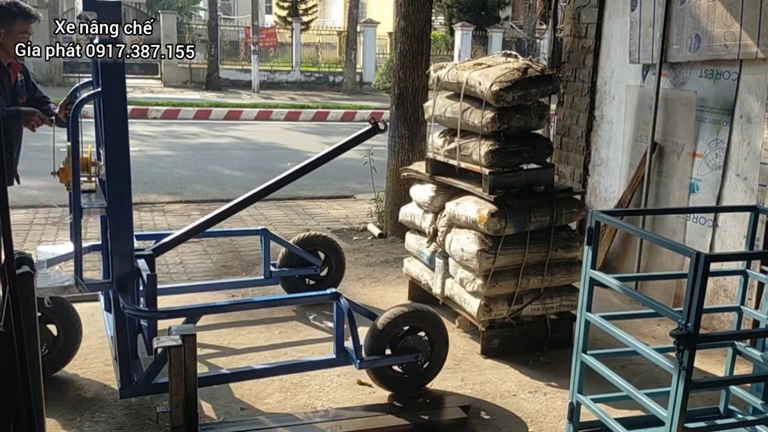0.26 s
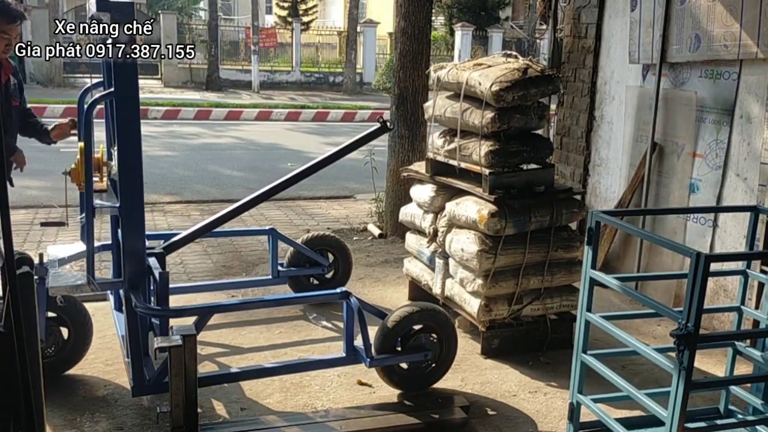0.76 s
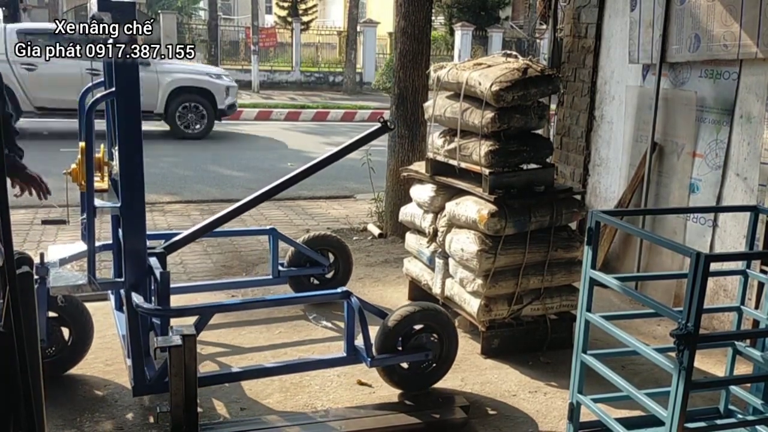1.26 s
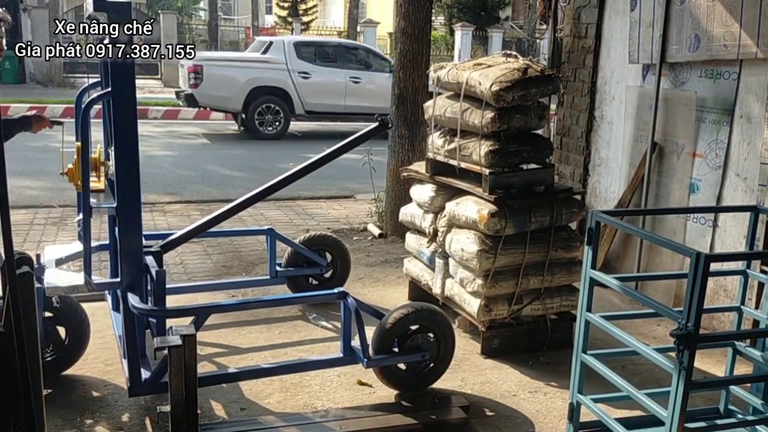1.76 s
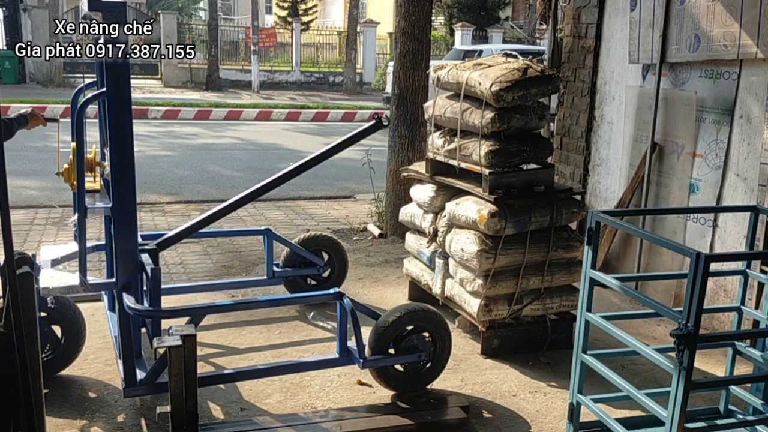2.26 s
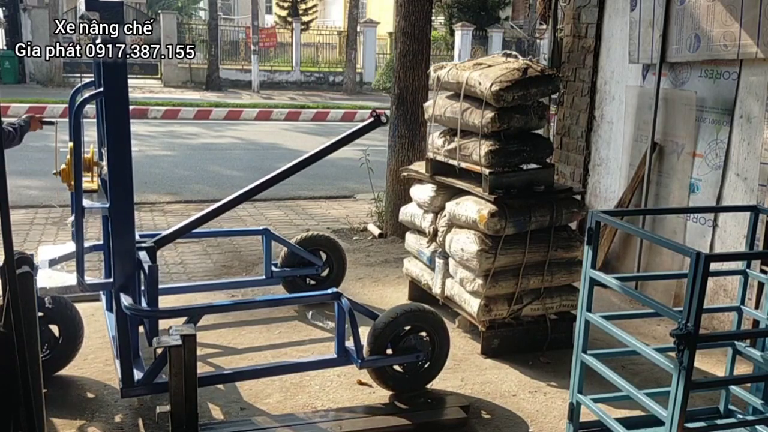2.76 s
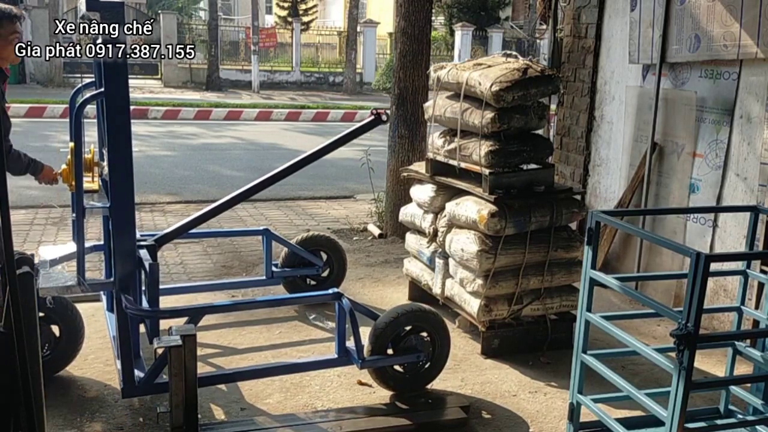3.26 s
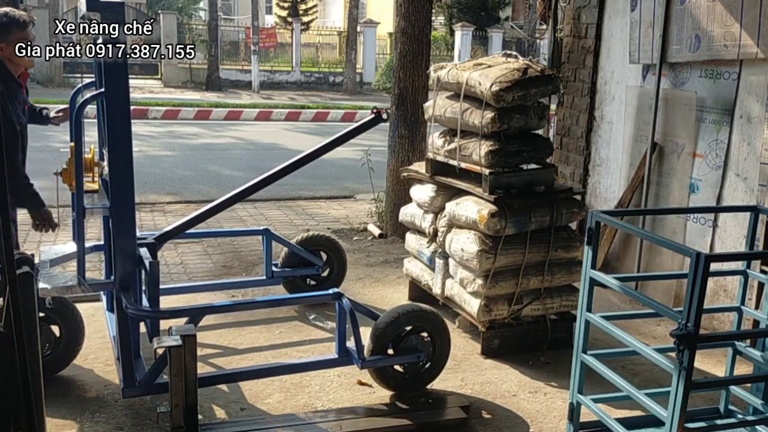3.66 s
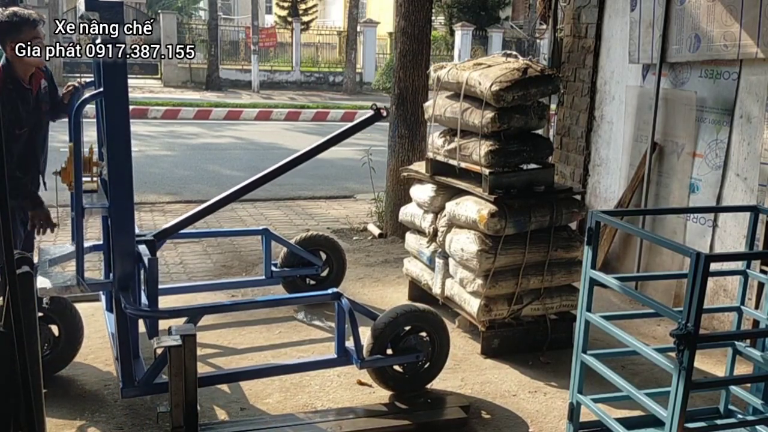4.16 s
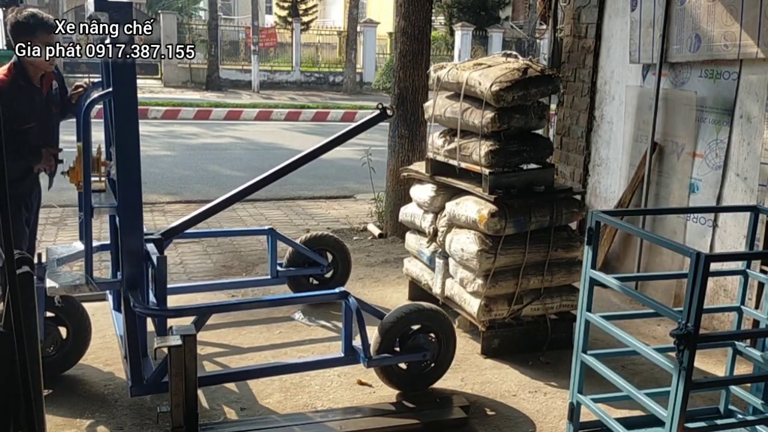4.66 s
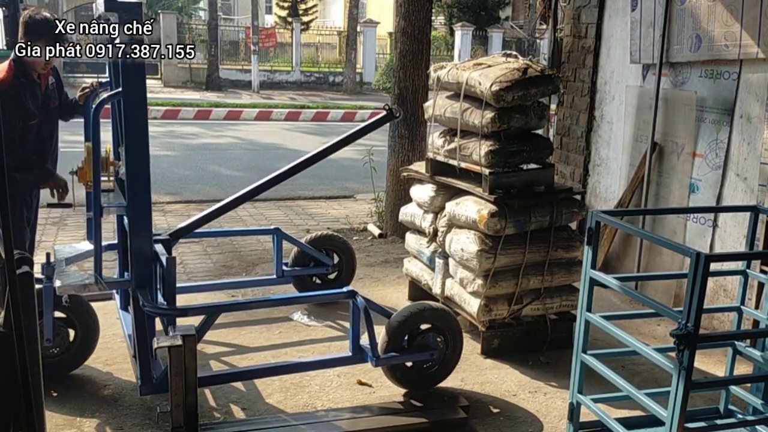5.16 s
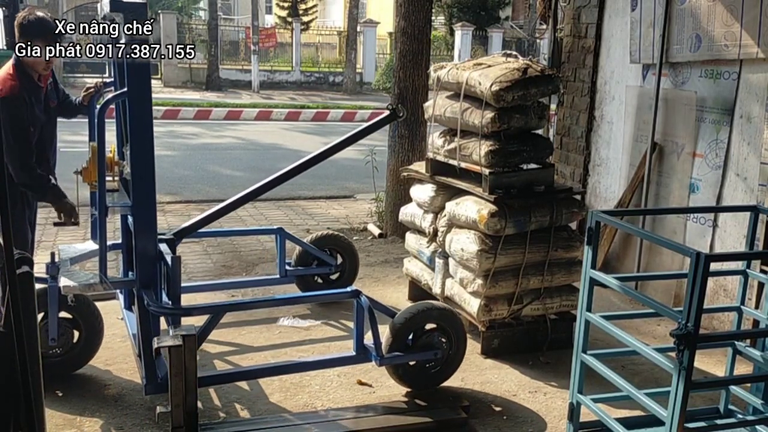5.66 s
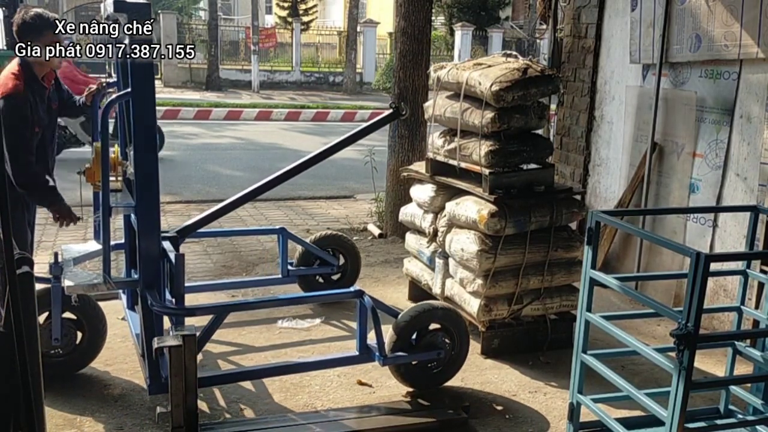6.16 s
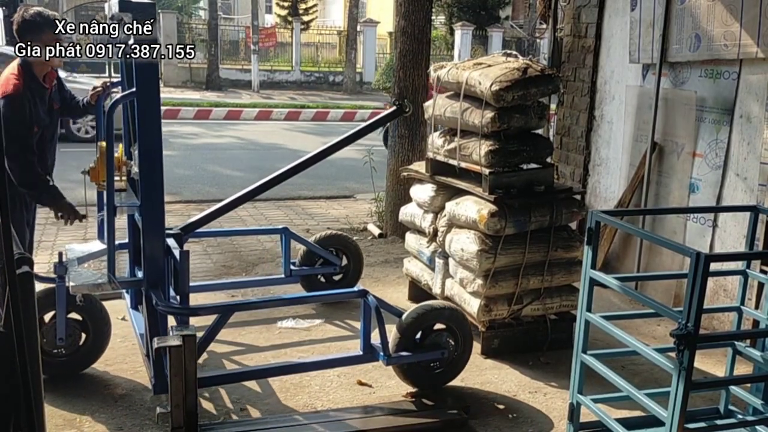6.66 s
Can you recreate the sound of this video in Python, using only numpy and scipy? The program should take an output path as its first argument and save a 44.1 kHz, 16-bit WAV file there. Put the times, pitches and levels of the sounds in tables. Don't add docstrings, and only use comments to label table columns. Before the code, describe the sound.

A hand winch on a steel frame is cranked in three fast, bright metallic rattling runs outdoors while street traffic passes quietly behind.

```python
import sys
import numpy as np
from scipy import signal
from scipy.fft import rfft, irfft, next_fast_len
from scipy.io import wavfile
from scipy.ndimage import uniform_filter1d, map_coordinates

SR = 44100
rng = np.random.default_rng(int(sys.argv[2]) if len(sys.argv) > 2 else 0)


def boost(x):
    u = np.asarray(x, float) / 20
    return 10 ** u


def int16_out(signal):
    q = np.round(np.clip(np.atleast_2d(signal).T, -1, 1) * 32767)
    wavfile.write(sys.argv[1], SR, q.astype(np.int16))


N = 304728


def unit(x):
    return x / np.sqrt(np.mean(x ** 2) + 1e-20)


def along(points, hz):
    f, v = np.transpose(points)
    return np.interp(np.log(hz + 1), np.log(f + 1), v)


def curves(rows):
    s, *cols = np.transpose(rows)
    return [np.interp(np.arange(N) / SR, s, c) for c in cols]


def wobble(rate):
    knots = rng.standard_normal(int(N * 200 / SR) + 4)
    return map_coordinates(knots, [np.arange(N) * min(rate, 200) / SR])


def filtered(x, response):
    n = x.shape[-1]
    m = next_fast_len(n + 8192)
    return irfft(rfft(x, m) * response(np.fft.rfftfreq(m, 1 / SR)), m)[..., :n]


def noise(spectrum):
    return unit(filtered(rng.standard_normal(N), lambda hz: boost(along(spectrum, hz))))


# time in seconds, rattle level in dB, pace in teeth per second.
RUNS = [
    [(0.0, -22, 43.5), (0.11, -22.5, 44), (0.32, -26.5, 44.5), (0.56, -23.5, 39), (0.665, -23.5, 39)],
    [(1.51, -22, 40), (1.85, -22.5, 43), (2.13, -22, 51), (2.6, -22.5, 51), (2.95, -24.5, 46),
     (3.25, -22, 45), (3.5, -22, 41), (4.25, -21, 43), (4.45, -25.5, 47)],
    [(5.76, -24.5, 40.5), (5.92, -21.5, 42), (6.05, -23, 42.5), (6.33, -21, 42), (6.6, -23.5, 42),
     (6.91, -20.5, 51)],
]
# start in seconds, blow in dB.
DROPS = [
    (1.494, 10),
    (5.5533, 8.5),
    (5.589, 6),
    (5.6135, 10.5),
    (5.69, 10.5),
    (5.7275, 13),
    (5.7604, 13),
]
FRAME_DB, MAST_DB = -13, -18.5
FRAME_SWAY_DB, MAST_SWAY_DB, SWAY_PER_S = -0.15, 0.93, 6
DROP_FRAME_DB, DROP_MAST_DB = -13.5, -20
TURN_S, FIRST_PULL_S, PULL_DB, FRAME_FEELS = 0.545, 0.1, 1.5, 0.17


def blows():
    rows = [[s, db, db + DROP_FRAME_DB, db + DROP_MAST_DB] for s, db in DROPS]
    frame = FRAME_DB + FRAME_SWAY_DB * wobble(SWAY_PER_S)
    mast = MAST_DB + MAST_SWAY_DB * wobble(SWAY_PER_S)
    steps_per_s = 2000
    for run in RUNS:
        s, level, rate = np.transpose(run)
        start = -0.4 if s[0] < 0.05 else s[0]
        t = np.arange(start, s[-1], 1 / steps_per_s)
        for speed, share_db, scatter_db, jitter in [(1, 2, 2.47, 0.08), (5.3, 0, 3.5, 0.5)]:
            turns = np.cumsum(speed * np.interp(t, s, rate)) / steps_per_s
            hit_s = t[np.flatnonzero(np.diff(np.floor(turns)))]
            luck = rng.standard_normal((len(hit_s), 4))
            per_s = speed * np.interp(hit_s, s, rate)
            db = np.interp(hit_s, s, level) + share_db + 10 * np.log10(SR / per_s)
            at = np.clip((hit_s * SR).astype(int), 0, N - 1)
            pull = PULL_DB * np.cos(2 * np.pi * (hit_s - s[0] - FIRST_PULL_S) / TURN_S)
            above = [0 * db, frame[at] + FRAME_FEELS * pull, mast[at] + pull]
            levels = db + above + scatter_db * luck[:, 1:].T
            rows += np.transpose([hit_s + jitter * luck[:, 0] / per_s, *levels]).tolist()
    return np.array(rows)


def steel_patterns():
    jags = rng.standard_normal(SR // 60)
    clumps = lambda hz: boost(1.4 * np.interp(hz / 32, np.arange(len(jags)), jags))
    biases = 1.5 * rng.standard_normal((4, 60))
    return clumps, biases - biases.mean(axis=0)


# frequency in Hz, time to fall 60 dB in seconds.
DYING = [(600, 0.51), (1300, 0.42), (3500, 0.64), (6500, 0.46), (8000, 0.5), (11000, 0.4), (13500, 0.51),
         (15500, 0.33)]


def ring(spectrum, modes, crack_db, clumps, bias):
    t = np.arange(SR) / SR
    crack = boost(crack_db - 60 * t / 0.004)
    burst = rng.standard_normal((2, SR)) * [crack, np.ones(SR)]
    hz, when, z = signal.stft(burst, SR, nperseg=512)
    z[1] *= boost(-60 * when / along(DYING, hz)[:, None])
    favour = np.interp(hz / 450, np.arange(len(bias)), bias)
    colour = boost(along(spectrum, hz) + favour)[:, None]
    dense = signal.istft(z.sum(0) * colour, SR, nperseg=512)[1][:SR]
    dense = filtered(dense, clumps)
    lines = np.zeros(SR)
    for f, db, t60 in modes:
        tone = np.sin(2 * np.pi * ((f + rng.normal(0, 18)) * t + rng.random()))
        lines += boost(db + rng.normal(0, 0.47) - 60 * t / t60) * tone / np.sqrt(t60)
    rise = 1 - np.exp(-t / 0.00073)
    return rise * (dense / np.linalg.norm(dense) + lines * np.sqrt(28 / SR))


# frequency in Hz, density in dB per Hz.
WHEEL = [(2470, -35), (4300, -8), (5200, -5), (5620, -9), (6100, -8), (6330, -4), (7100, -4), (7750, 0),
         (8450, -1), (8900, -4), (10400, -7), (11800, -4.5), (13800, -5), (15550, 6.3)]
FRAME = [(1120, -71), (1900, -3), (2090, 0), (2630, 1.5), (3040, -3.5), (3460, 0.5), (4500, -8),
         (5850, -10), (9900, -120)]
MAST = [(320, -14), (550, -12.5), (847, 0), (1040, -3), (1360, -3), (1590, -3.5), (1730, 2), (2000, -11.5),
        (2600, -10), (4400, -120)]
# frequency in Hz, level in dB, time to fall 60 dB in seconds.
WHEEL_MODES = [(4750, -30, .65), (4930, -30, .4), (5325, -26, .35), (5520, -32, .4), (5800, -33, .3),
               (7340, -26, .4), (7742, -27, .3), (8013, -27, .4), (8125, -24, .4), (8430, -26, .3),
               (14370, -28, .25), (14830, -24, .25), (15530, -25, .2)]
FRAME_MODES = [(2147, -23, .3), (2464, -23, .35), (2718, -22, .25), (3346, -22, .3), (3903, -24, .35),
               (4032, -25, .35)]
MAST_MODES = [(856, -13, .22), (1385, -18, .3), (1692, -14, .35), (1790, -19, .3)]


def winch(clumps, biases):
    lead = SR // 2
    rows = blows()
    at = np.clip(np.round(rows[:, 0] * SR).astype(int) + lead, 0, N + lead - 1)
    leaning = np.array([wobble(3.5) for _ in range(4)])[:, np.maximum(at - lead, 0)]
    spot = np.argmax(leaning + 0.6 * rng.standard_normal((4, len(at))), axis=0)
    bodies = [(1, WHEEL, WHEEL_MODES), (2, FRAME, FRAME_MODES), (3, MAST, MAST_MODES)]
    m, total = next_fast_len(N + lead + SR), 0
    for k, bias in enumerate(biases):
        for col, body, modes in bodies:
            train = np.bincount(at[spot == k], boost(rows[spot == k, col]), m)
            blow = ring(body, modes, crack_db=-18, clumps=clumps, bias=bias)
            total = total + rfft(train) * rfft(blow, m)
    return irfft(total, m)[lead:lead + N]


# time in seconds, level in dB.
GUSTS = [(0, -37), (.3, -34.5), (.55, -40.5), (1.25, -35), (1.9, -42), (2.2, -40.5), (3.7, -44.5),
         (4.45, -37.5), (5.2, -48), (5.9, -47), (6.91, -46)]
# frequency in Hz, density in dB per Hz.
WIND = [(1, -18), (5, -20), (12, 10.5), (27, -10.5), (45, -1.5), (80, -17), (120, -49), (200, -120)]


def wind():
    return boost(curves(GUSTS)[0] + 1.6 * wobble(5)) * noise(WIND)


# time in seconds, level in dB.
NEARNESS = [
    (0, -41),
    (.8, -44),
    (1.4, -44),
    (3, -47.5),
    (4.7, -49.5),
    (5.5, -46),
    (6.0, -40),
    (6.91, -44.5),
]
# frequency in Hz, density in dB per Hz.
RUMBLE = [(29, -38), (50, -6), (97, -0.5), (130, -8.5), (384, -17.5), (421, -22), (600, -30), (780, -79),
          (1320, -120)]
ROAD = [(200, -55), (380, -13.5), (700, -6.5), (1150, -6.5), (1900, -9.5), (2800, -14), (3600, -21.5),
        (5000, -28.5), (8000, -62), (12000, -120)]
HISS = [(2000, -30), (3500, -17), (6000, -9), (8050, -5.5), (9800, -13), (12400, -9), (15000, 0.5),
        (16500, -3.5)]
FAR_DB = -48.5
RUMBLE_DB, RUMBLE_GROWS = -47.5, 0.55
HISS_DB, HISS_GROWS = -56.5, 0.76
SHAKE_DB = 3


def street():
    near_db, = curves(NEARNESS)
    t = np.arange(N) / SR
    cranked = sum(1.0 * (t >= run[0][0]) * (t <= run[-1][0]) for run in RUNS)
    cranked = uniform_filter1d(cranked, size=4000)
    closer_db = near_db - FAR_DB
    rumble_db = RUMBLE_DB + RUMBLE_GROWS * closer_db + SHAKE_DB * cranked + 0.39 * wobble(3.92)
    rumble = boost(rumble_db) * noise(RUMBLE)
    tyres = boost(near_db + 0.7 * wobble(3)) * noise(ROAD)
    hiss = boost(HISS_DB + HISS_GROWS * closer_db) * noise(HISS)
    return rumble + tyres + hiss


def far_whine():
    tone = np.sin(2 * np.pi * 420 * np.arange(N) / SR)
    return np.sqrt(2) * boost(-63 + 3 * wobble(9.9)) * tone


def engine(rows, orders_db, booms, rough_db):
    first, last = rows[0], rows[-1]
    hz, db = curves([(first[0] - 0.2, first[1], -90), *rows, (last[0] + 0.2, last[1], -90)])
    phase = 2 * np.pi * np.cumsum(hz) / SR
    out = np.zeros(N)
    for order, order_db in enumerate(orders_db, 1):
        lift = sum(gain * np.exp(-((order * hz - centre) / width) ** 2) for centre, width, gain in booms)
        level = boost(db + order_db + lift + rough_db * wobble(13.0))
        out += np.sqrt(2) * level * np.sin(order * phase + 6 * rng.random())
    return out


# time in seconds, firing rate in Hz, level in dB.
PICKUP = [
    (0.2, 30.4, -51),
    (.6, 28.15, -45),
    (1.3, 26.7, -39),
    (2.0, 26.34, -51),
    (2.5, 25.5, -44),
]
PICKUP_ORDERS = [0, -2.5]


def pickup():
    return engine(PICKUP, PICKUP_ORDERS, [], rough_db=4.0)


BRAKE_S, BRAKE_FOR_S = 0.78, 0.9
SQUEAL_HZ, CLIMB_HZ, CLIMB_S, SAG_HZ_PER_S = 12110, 420, 0.22, 190
SQUEAL_DB, SQUEAL_ATTACK_S = -53, 0.064


def squeal():
    since = np.maximum(np.arange(N) / SR - BRAKE_S, 0)
    hz = SQUEAL_HZ - CLIMB_HZ * np.exp(-since / CLIMB_S) - SAG_HZ_PER_S * since
    release = np.clip((BRAKE_FOR_S - since) / SQUEAL_ATTACK_S, 0, 1)
    held = (1 - np.exp(-since / SQUEAL_ATTACK_S)) * release
    glide = np.exp(2j * np.pi * np.cumsum(hz) / SR)
    tremble = np.exp(2j * np.pi * np.cumsum(45 * wobble(120)) / SR)
    shape = np.exp(-((np.fft.fftfreq(N, 1 / SR) - 110) / 170) ** 2)
    fringe = np.fft.ifft(np.fft.fft(rng.standard_normal(N)) * shape)
    voice = (tremble + 0.85 * fringe / np.std(fringe)) * glide
    return boost(SQUEAL_DB) * held * unit(voice.real)


# time in seconds, firing rate in Hz, level in dB.
BIKE = [
    (4.3, 36.13, -51),
    (5.0, 35.5, -57),
    (5.66, 35, -54),
    (6.0, 32.62, -45),
    (6.46, 29.7, -53.5),
    (6.91, 28.4, -47),
]
BIKE_ORDERS = [1, 2, -5, -11, -14]
# centre in Hz, width in Hz, lift in dB.
BOOMS = [(28.5, 1.2, 13), (60, 2.5, 6), (100, 3.5, 15), (115.5, 3.5, 16), (148, 6, 11)]


def motorbike():
    return engine(BIKE, BIKE_ORDERS, BOOMS, rough_db=3.5)


# frequency in Hz, density in dB per Hz.
HANDLE = [(1000, -24), (2500, 1), (5000, -13), (8000, -8), (10000, -10), (12000, -4), (13500, -6),
          (15300, 3), (16500, -6)]
# frequency in Hz, level in dB, time to fall 60 dB in seconds.
HANDLE_MODES = [(10050, -20, 0.32), (11950, -16, 0.31), (15400, -18, 0.26)]
TICK_S, TICK_DB = 4.749, -11.5


def handle_tick(clumps, bias):
    out = np.zeros(N)
    knock = ring(HANDLE, HANDLE_MODES, crack_db=2, clumps=clumps, bias=bias)
    out[round(TICK_S * SR):][:SR] += boost(TICK_DB) * knock
    return out


def scene():
    clumps, biases = steel_patterns()
    yard = winch(clumps, biases) + handle_tick(clumps, biases[0])
    traffic = far_whine() + pickup() + squeal() + motorbike()
    return np.tile(yard + wind() + street() + traffic, (2, 1))


def top_cut(x):
    return signal.sosfilt(signal.butter(12, 16890, fs=SR, output="sos"), x)


# time in seconds, band centre in Hz.
SPLITS = [(1.615, 8680), (1.615, 15160), (1.849, 7300), (2.453, 13800), (3.008, 9690), (3.87, 9650),
          (3.87, 13090), (4.101, 6270), (4.867, 7670), (4.867, 11070), (5.425, 9650), (5.425, 13110),
          (6.424, 4850), (6.424, 12400)]
SPLIT_WIDTH_HZ, SPLIT_DB = 1430, -0.5
TOP_HZ = 15770


def record(dry):
    side, size = np.zeros(N), 1536
    for s, centre_hz in SPLITS:
        start = round(s * SR) - size // 2
        earlier = dry[0, start - size:start]
        band = filtered(earlier, lambda hz: abs(hz - centre_hz) < SPLIT_WIDTH_HZ / 2)
        side[start:start + size] += boost(SPLIT_DB) * np.hanning(size) * band
    mix = filtered(dry + [side, -side], lambda hz: hz < TOP_HZ)
    return top_cut(mix)


dry = scene()
out = record(dry)
int16_out(out)
```